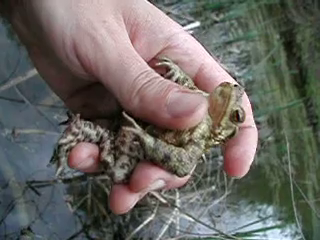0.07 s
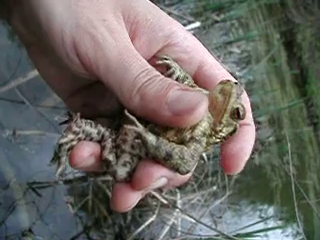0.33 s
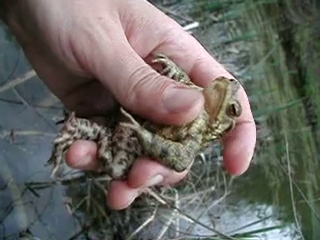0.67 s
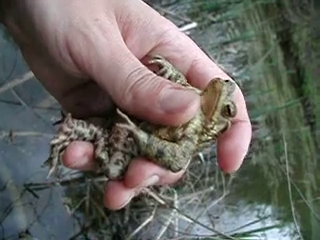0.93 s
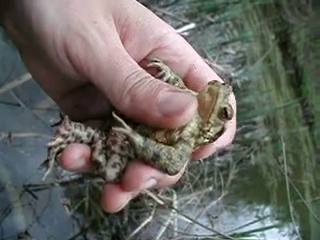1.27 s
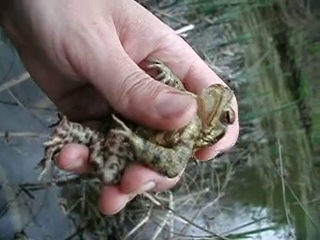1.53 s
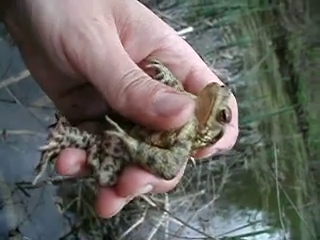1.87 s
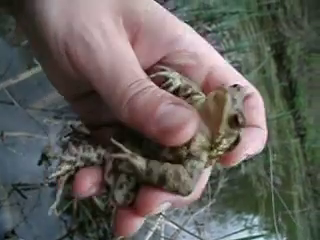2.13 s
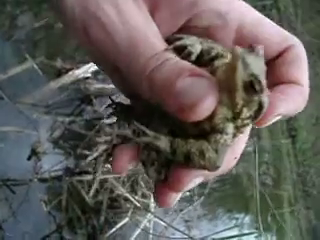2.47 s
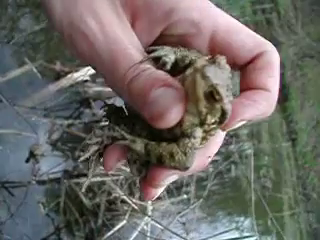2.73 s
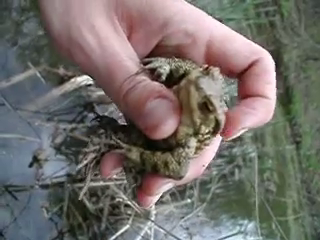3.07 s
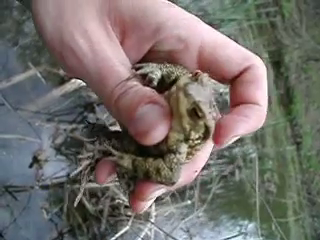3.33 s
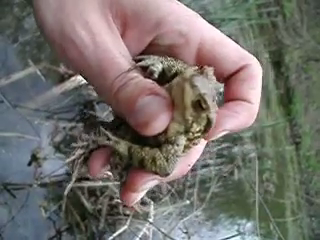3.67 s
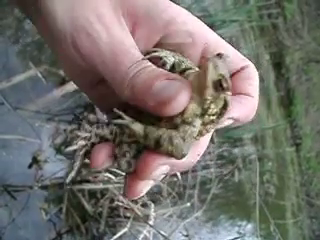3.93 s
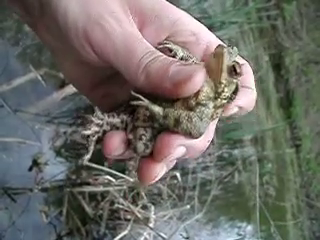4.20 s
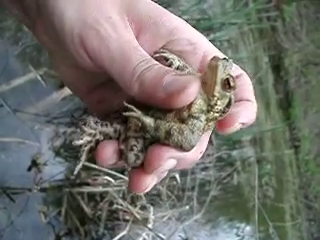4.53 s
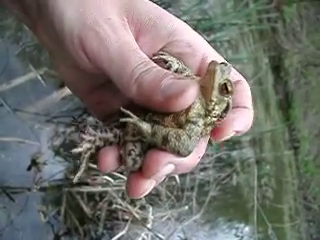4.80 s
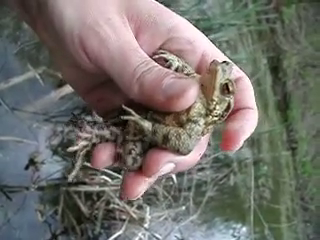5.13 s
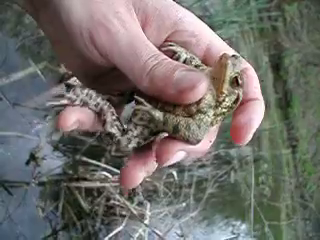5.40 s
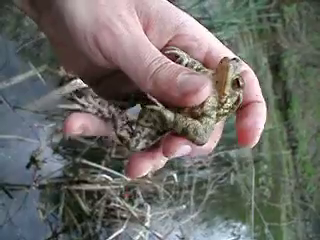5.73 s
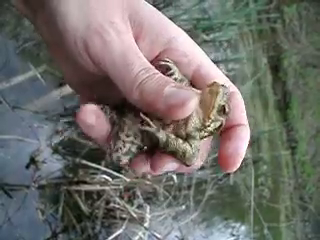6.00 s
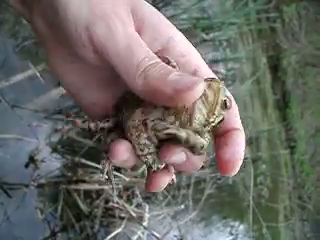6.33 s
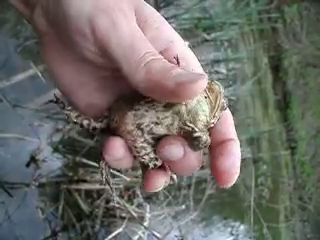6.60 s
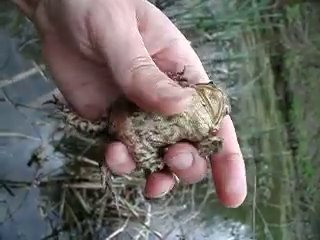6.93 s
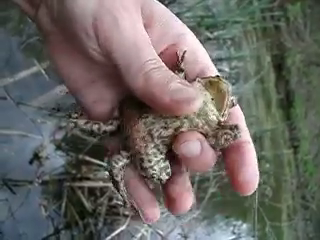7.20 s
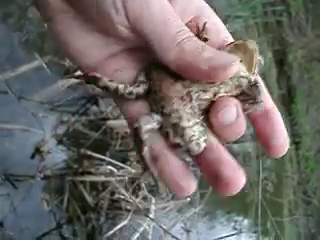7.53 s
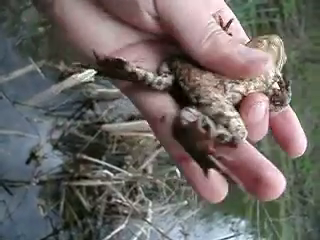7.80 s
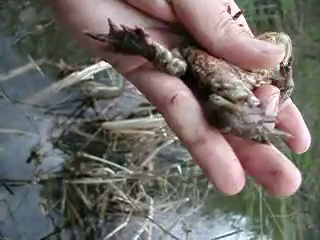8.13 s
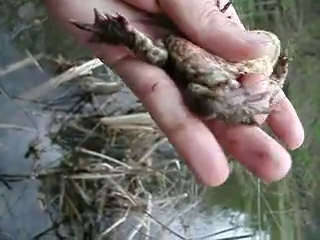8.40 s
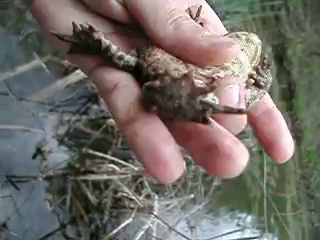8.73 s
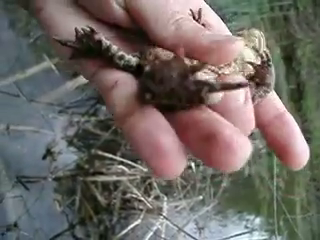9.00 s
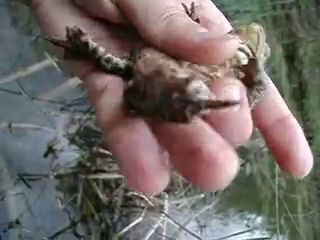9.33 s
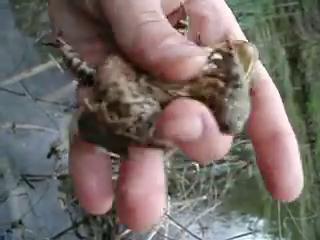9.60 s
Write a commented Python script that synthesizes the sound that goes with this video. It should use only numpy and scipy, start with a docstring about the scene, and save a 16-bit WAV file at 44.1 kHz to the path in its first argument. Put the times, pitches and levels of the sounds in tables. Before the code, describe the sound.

A sharp pop opens the sound, followed by faint pondside air, steady hiss and a low hum that last throughout, all slightly muffled. Close to the microphone, a hand-held toad gives seven very short, dry chirps at about 1.7, 3.9, 4.6, 5.7, 7.1, 7.4 and 9.5 seconds. Those at 1.7, 5.7 and 7.4 seconds begin with a rapid stutter of pulses that runs into a clean, falling tone; the last chirp is the weakest. Fingers softly rub and squeak on the plastic camera case around 2.5 seconds, then make louder, quick clusters of knocks, rubs and squeaks at about 3.9 and 7.8 seconds, with a few tiny rubs between. Far off, a very faint motor holds a wavering tone from about 3 to 7.5 seconds. A distant bird gives two faint rising whistles at about 4.5 and 4.7 seconds.

```python
"""A pop as a small camera's narrow-band microphone input switches on, then faint pondside air, hiss and hum.
Close to the microphone a hand-held toad gives seven short release chirps with its vocal cords;
three open as a stutter of separate pulses that runs into a clean, falling tone.
Fingers knock, rub and squeak on the camera case. Far off, a motor drones and a bird whistles twice."""
import sys
import numpy as np
from scipy import signal
from scipy.fft import rfft, irfft
from scipy.io import wavfile

SR = 44100
rng = np.random.default_rng(int(sys.argv[2]) if len(sys.argv) > 2 else 0)


def bounce(signal):
    """Save signal as a 16-bit WAV file at the path given by the first command-line argument."""
    frames = np.transpose(np.atleast_2d(signal))
    limited = np.clip(frames, -1, 1)
    pcm = np.round(limited * 32767).astype(np.int16)
    wavfile.write(sys.argv[1], SR, pcm)


N = 426006


def gain_of(db):
    """Decibels to amplitude."""
    return 10 ** (np.asarray(db) / 20)


def unit_rms(x):
    """Scales to an rms of one."""
    return x / np.sqrt(np.mean(x ** 2) + 1e-20)


def add(mix, start_s, sound):
    """Mixes a sound in at its start time."""
    part = mix[round(start_s * SR):][:len(sound)]
    part += sound[:len(part)]


def noise(spectrum):
    """Steady noise with the given spectrum and an rms of one."""
    hz, db = np.transpose(spectrum)
    shape_db = np.interp(np.log(np.fft.rfftfreq(N, 1 / SR) + 1), np.log(hz), db)
    return unit_rms(irfft(rfft(rng.standard_normal(N)) * gain_of(shape_db), N))


def wander(t, rate_hz):
    """Smooth random drift, no faster than the given rate."""
    rates = rate_hz * np.geomspace(1 / 10, 1, 20)
    return sum(np.sin(2 * np.pi * (hz * t + rng.random())) for hz in rates) / np.sqrt(10)


def low_pass(x, hz, taps):
    """A steep linear-phase low-pass."""
    return signal.oaconvolve(x, signal.firwin(taps, hz, window=("kaiser", 9), fs=SR), "same")


# outdoor air noise, coloured by the resonances of the camera case: frequency_hz, density_db
AIR_SPECTRUM = [(60, -8.5), (250, -10.5), (520, -7.5), (690, -1.5), (790, -5.5), (900, -3), (1080, -1.5),
                (1260, -5.5), (1430, -2), (1650, -5.5), (1900, -3.5), (2300, -8.5), (3200, -19),
                (4200, -33)]
# its slow rise and fall: time_s, level_db
AIR_LEVELS = [(0, -47), (3.0, -47), (4.2, -46), (6.4, -46.5), (7.65, -44), (7.9, -42.5), (8.4, -44.5),
              (9.66, -45)]


def pond_air(swell_db=-0.35):
    """Faint outdoor air, coloured by the case around the microphone and swelling a little."""
    t = np.arange(N) / SR
    air = noise(AIR_SPECTRUM)
    return air * gain_of(np.interp(t, *np.transpose(AIR_LEVELS)) + swell_db * wander(t, 6))


# hum inside the camera: pitch_hz, rms_db
HUM_TONES = [(86.1, -60), (129.2, -68.5), (161.5, -57)]
# spectrum of the microphone's hiss: frequency_hz, density_db; then its overall rms
HISS, HISS_DB = [(20, 8), (200, -6.5), (600, 1.5), (2000, -1), (3000, 2), (3700, 0), (4400, -4)], -45.5


def self_noise():
    """The microphone hisses evenly and the camera's circuits hum."""
    t = np.arange(N) / SR
    hum = sum(np.sqrt(2) * gain_of(db) * np.sin(2 * np.pi * (hz * t + rng.random()))
              for hz, db in HUM_TONES)
    return gain_of(HISS_DB) * noise(HISS) + hum


# a motor in the distance: time_s, pitch_hz, rms_db
MOTOR_TRACK = [(2.9, 622, -71), (3.3, 644, -58.5), (3.7, 664, -59), (5.4, 680, -62.5), (6.0, 667, -60.5),
               (7.6, 680.5, -67)]


def far_motor(waver_hz=5, fading_db=3):
    """One faint engine tone, wavering and fading on its long way through the air."""
    times, hz, db = np.transpose(MOTOR_TRACK)
    t = np.arange(times[0], times[-1], 1 / SR)
    phase = 2 * np.pi * np.cumsum(np.interp(t, times, hz) + waver_hz * wander(t, 25)) / SR
    level = gain_of(np.interp(t, times, db) + fading_db * wander(t, 13))
    return times[0], np.sqrt(2) * level * np.sin(phase)


# a bird, far from the microphone: start_s, length_s, rms_db, first_hz, last_hz
BIRD_WHISTLES = [(4.459, .095, -60, 3210, 4200), (4.717, .095, -58, 3280, 4300)]


def bird_whistle(length_s, rms_db, first_hz, last_hz):
    """A distant pure tone that sweeps upward."""
    hz = np.linspace(first_hz, last_hz, round(length_s * SR))
    tone = np.sin(2 * np.pi * np.cumsum(hz) / SR) * signal.windows.tukey(len(hz), .5)
    return gain_of(rms_db) * unit_rms(tone)


# modes of the camera case around the microphone: frequency_hz, level_db, t60_s
CASE_MODES = [(340, -29, 0.018), (672, -3.5, 0.015), (1096, 2, 0.015), (1434, -4.5, 0.013),
              (1542, -9.5, 0.03), (1924, -1, 0.016), (2170, -13.5, 0.0064), (2860, -19, 0.015)]
# knocks of the grip on that case: start_s, peak_db, tilt_db_per_octave
GRIP_KNOCKS = [(2.074, -35.5, -23), (3.9066, -13.5, -2.5), (3.9237, -21, 0.5), (3.9297, -20.5, -2),
               (3.9478, -25, 13), (7.7167, -25.5, -14), (7.7544, -17, -1), (7.7707, -10.5, -5),
               (7.7836, -14, -3.5), (7.8035, -23, 17)]


def case_knock(peak_db, tilt_db, rise_s=0.00068):
    """The plastic case rings after one tap; the tilt makes it duller or brighter."""
    t = np.arange(SR // 20) / SR
    ring = sum(gain_of(db + tilt_db * np.log2(hz) - 60 * t / t60) * np.sin(2 * np.pi * hz * t)
               for hz, db, t60 in CASE_MODES)
    ring *= 1 - np.exp(-t / rise_s)
    return gain_of(peak_db) * ring / abs(ring).max()


# fingers rubbing the case, right at the microphone: start_s, length_s, rms_db, tilt_db_per_octave
FINGER_RUBS = [(2.39, 0.037, -52, 11), (2.518, 0.088, -47, -9), (3.878, 0.023, -35.5, -3),
               (3.909, 0.036, -30, 1), (3.928, 0.0494, -40, 8), (5.785, 0.05, -46.5, -5.5),
               (6.493, 0.019, -48.5, -11), (6.793, 0.018, -46.5, -7), (7.751, 0.048, -29, 3.5),
               (7.79, 0.036, -37.5, -6), (7.809, 0.064, -46.5, 4)]


def finger_rub(length_s, rms_db, tilt_db, slips_per_s=1500, spread_db=4):
    """Many tiny slips of skin ring the case."""
    count = round(length_s * SR)
    slips = (rng.random(count) < slips_per_s / SR) * rng.choice([-1, 1], count)
    strength = gain_of(spread_db * rng.standard_normal(count)) * signal.windows.tukey(count, .5)
    sound = signal.fftconvolve(slips * strength, case_knock(0, tilt_db))
    return gain_of(rms_db) * sound / (np.std(sound[:count]) + 1e-9)


# skin squeaking on the case, just as close: start_s, length_s, rms_db, pitch_hz, octave_db
SKIN_SQUEAKS = [(2.531, 0.085, -47, 536, -5.5), (3.927, 0.049, -44, 647, -31),
                (7.7146, 0.013, -35, 538, -6), (7.7714, 0.0086, -15.5, 1098, -34),
                (7.779, 0.022, -42.5, 3000, -30)]


def skin_squeak(length_s, rms_db, pitch_hz, octave_db, waver_hz=25, flutter_db=2.2):
    """Skin sticks and slips at an unsteady rate."""
    t = np.arange(round(length_s * SR)) / SR
    phase = 2 * np.pi * np.cumsum(pitch_hz + waver_hz * wander(t, 160)) / SR
    tone = np.sin(phase) + gain_of(octave_db) * np.sin(2 * phase)
    tone *= gain_of(flutter_db * wander(t, 120))
    return gain_of(rms_db) * unit_rms(tone * signal.windows.tukey(len(t), .7))


# brief ring after each pulse, from the toad's throat and the camera case: frequency_hz, swell_s, level_db
RING_MODES = [(1370, 0.0027, -13), (1863, 0.0014, -8.5), (2904, 0.00099, -9)]


def toad_pulse(peak_db, cord_hz, ring_db, open_s=0.0039):
    """The vocal cords swing for a few cycles; the throat and the camera case ring briefly."""
    t = np.arange(SR // 80) / SR
    opening = np.sin(np.pi * np.minimum(t / open_s, 1) ** .75) ** 2
    pulse = opening * np.sin(2 * np.pi * cord_hz * t)
    for hz, swell_s, mode_db in RING_MODES:
        swell = (t / swell_s * np.exp(1 - t / swell_s)) ** 2
        pulse += gain_of(mode_db + ring_db) * swell * np.sin(2 * np.pi * hz * t)
    return gain_of(peak_db) * pulse / abs(pulse).max()


# close pulse trains that open three chirps: start_s, length_s, pulses_per_s, peak_db, cord_hz, ring_db
TOAD_RASPS = [(1.6392, 0.042, 160.3, -15.5, 1100, -1.5), (5.6512, 0.028, 153, -14, 1160, -2),
              (7.4180, .026, 134, -17, 1158, 1.5)]


def toad_rasp(length_s, pulses_per_s, peak_db, cord_hz, ring_db, swell_db=1.5, sag_hz_per_s=1400):
    """The larynx opens and shuts in quick pulses, strongest in the middle and sinking in pitch."""
    ages = np.arange(0, length_s, 1 / pulses_per_s)
    onsets = ages + .0001 * rng.standard_normal(len(ages))  # slightly uneven timing
    peaks_db = peak_db + swell_db * (np.sin(np.pi * ages / length_s) - .5)
    return [(onset_s, toad_pulse(db, cord_hz - sag_hz_per_s * age, ring_db))
            for age, onset_s, db in zip(ages, onsets, peaks_db)]


# change in the harmonics as the cords close: second_db, third_db, fourth_db
CLOSING_CHANGE_DB = [7, -7, 2.5]
# the toad in the hand, close to the microphone: start_s, length_s, level_db, fade_db, opening_hz,
# settled_hz, closing_hz, second_db, third_db, fourth_db, stutter_s (harmonics relative to the first)
TOAD_CHIRPS = [(1.6828, 0.055, -24.5, -13, 992, 864, 794, -12, -14.5, -23, 0.0054),
               (3.8728, 0.02, -20, -12, 1054, 887, 960, -6.5, -22, -36, 0),
               (4.6114, 0.031, -21.5, -12, 1040, 803, 876, -4.5, -16, -22, 0),
               (5.6736, 0.067, -20, -10.5, 1069, 904, 890, -14, -16, -27, 0.008),
               (7.0965, .046, -28, -6, 917, 850, 947, -9, -6.5, -29, 0.0014),
               (7.4433, 0.043, -28.5, -12, 960, 828, 826, -8.5, -7.5, -13.5, .007),
               (9.5498, .018, -33, -10, 990, 800, 840, -3, -11, -16, 0)]


def toad_chirp(length_s, level_db, fade_db, opening_hz, settled_hz, closing_hz,
               second_db, third_db, fourth_db, stutter_s,
               stutter_hz=195, jitter=0.0061, shimmer_db=0.16, drift_db=2.0, release_s=0.0063):
    """The cords swing freely; any opening stutter gives way to a harmonic tone that relaxes and dies."""
    t = np.arange(round(length_s * SR)) / SR
    progress = t / length_s
    relaxing_hz = (opening_hz - settled_hz) * np.exp(-progress / .13)
    hz = settled_hz + relaxing_hz + (closing_hz - settled_hz) * progress
    phase = 2 * np.pi * np.cumsum(hz * (1 + jitter * wander(t, 400))) / SR
    tone = np.sin(phase)
    build_up = 1 - np.exp(-t / 0.0025)  # harmonics grow as the swing of the cords widens
    for k, harmonic_db, closing_db in zip([2, 3, 4], [second_db, third_db, fourth_db], CLOSING_CHANGE_DB):
        colour_db = harmonic_db + closing_db * progress ** 2.9 + drift_db * wander(t, 120)
        tone += gain_of(colour_db) * build_up ** (k / 2) * np.sin(k * phase)
    stutter_depth = np.exp(-(t / (stutter_s + 1e-9)) ** 2)
    gate = 1 - stutter_depth * np.cos(np.pi * stutter_hz * t) ** 4
    attack_s = .5 / stutter_hz if stutter_s > 0 else 0.0035
    edges = np.minimum(t / attack_s, 1) * np.minimum((length_s - t) / release_s, 1)
    breath_db = level_db + fade_db * progress ** 1.75  # holds, then falls as the air runs out
    level = gain_of(breath_db + shimmer_db * wander(t, 300))
    return np.sqrt(2) * level * edges * gate * tone


def scene():
    """One microphone beside the pond: motor and bird far off, grip and toad close and dry."""
    mix = pond_air() + self_noise()
    add(mix, *far_motor())
    for table, source in [(BIRD_WHISTLES, bird_whistle), (GRIP_KNOCKS, case_knock),
                          (FINGER_RUBS, finger_rub), (SKIN_SQUEAKS, skin_squeak),
                          (TOAD_CHIRPS, toad_chirp)]:
        for start_s, *settings in table:
            add(mix, start_s, source(*settings))
    for start_s, *settings in TOAD_RASPS:
        for onset_s, pulse in toad_rasp(*settings):
            add(mix, start_s + onset_s, pulse)
    return mix[None]


def record(dry):
    """The camera's narrow-band input wakes far below its resting voltage and jumps back with a pop."""
    switch_on_s, pop_length_s, pop_depth, rest_offset = .07256, .00492, .72, .021
    t = np.arange(N) / SR
    voltage = rest_offset + np.where(t < switch_on_s + pop_length_s, -pop_depth, dry[0])
    narrow = low_pass(voltage, hz=4080, taps=191) * (t >= switch_on_s)
    return low_pass(narrow, hz=16900, taps=511)[None]


dry = scene()
out = record(dry)
bounce(out)
```